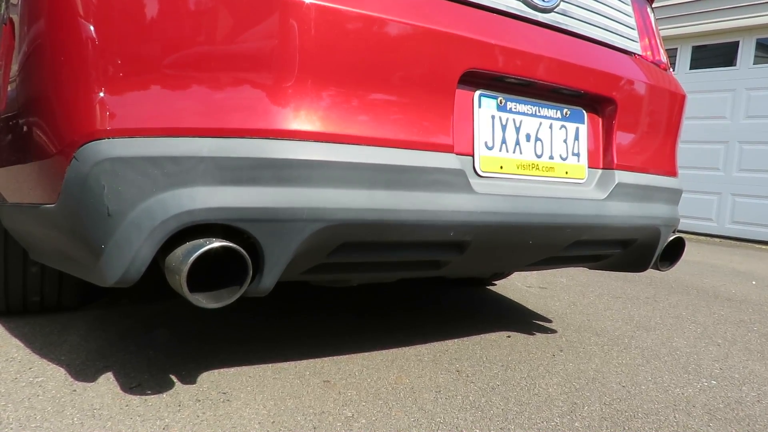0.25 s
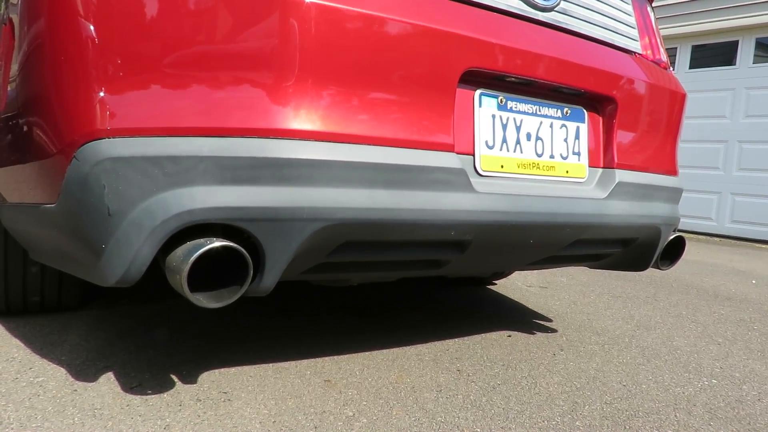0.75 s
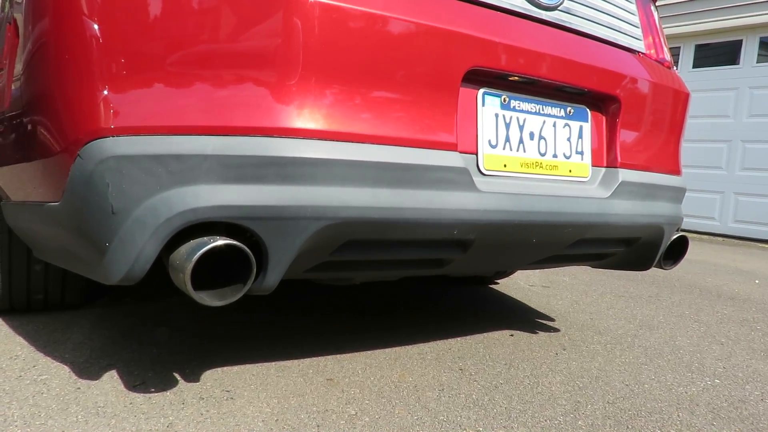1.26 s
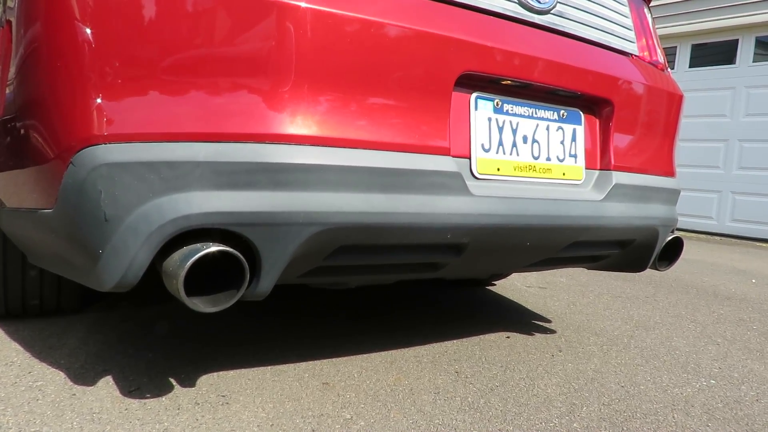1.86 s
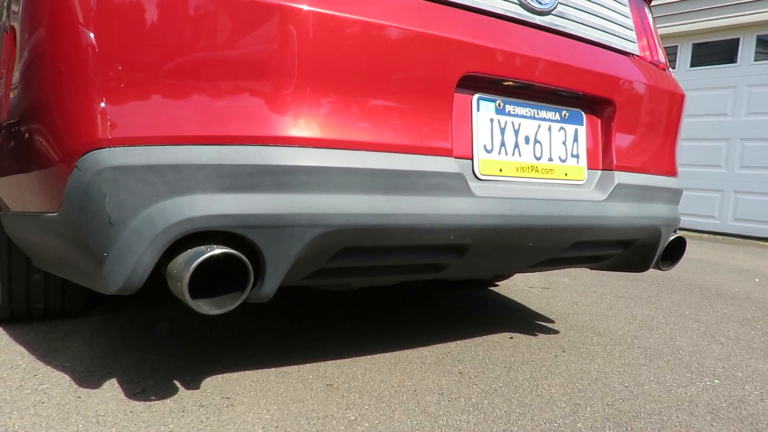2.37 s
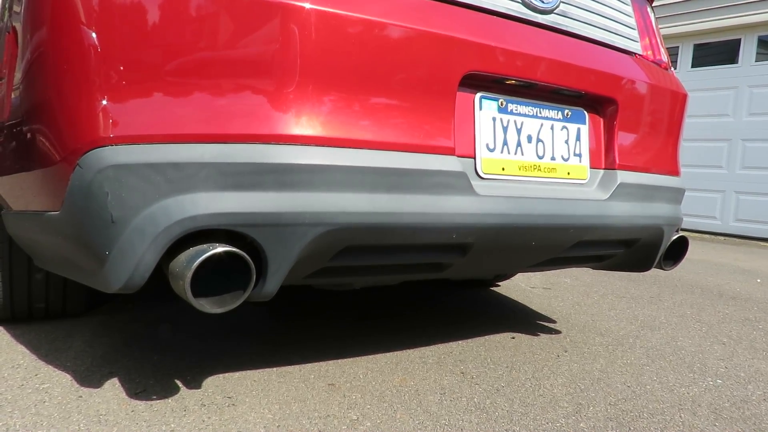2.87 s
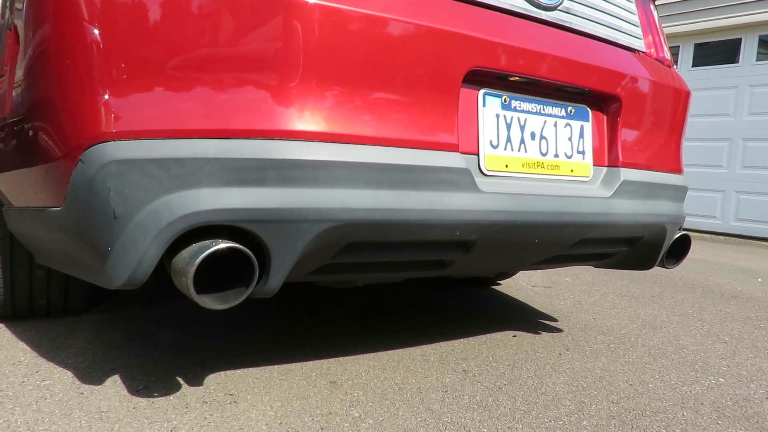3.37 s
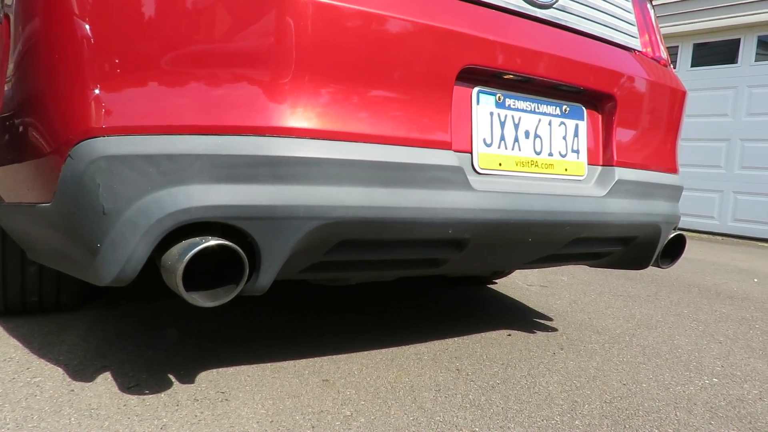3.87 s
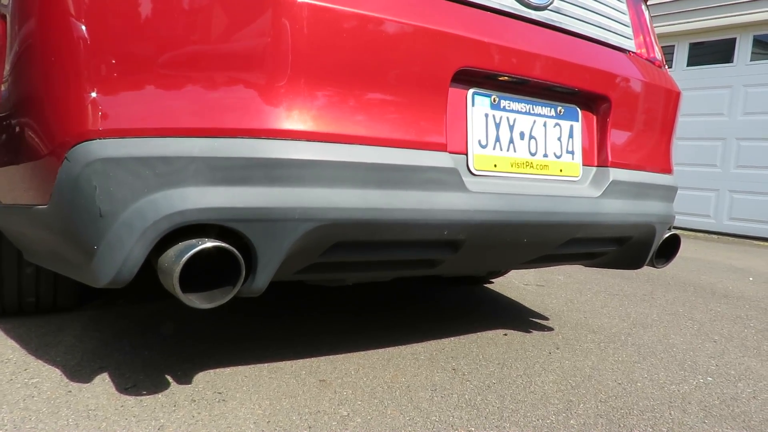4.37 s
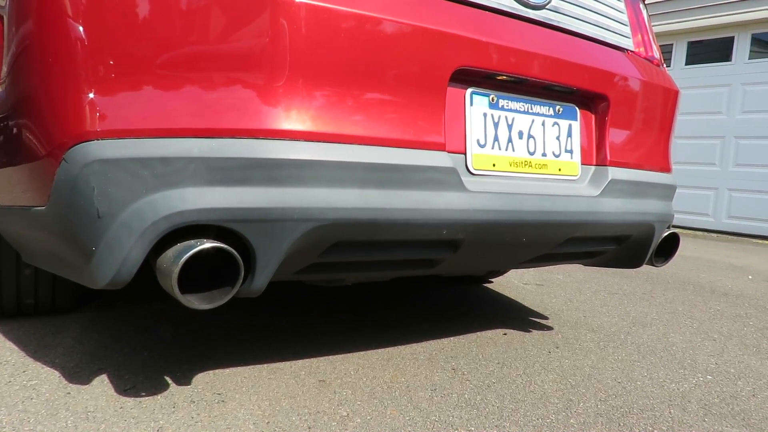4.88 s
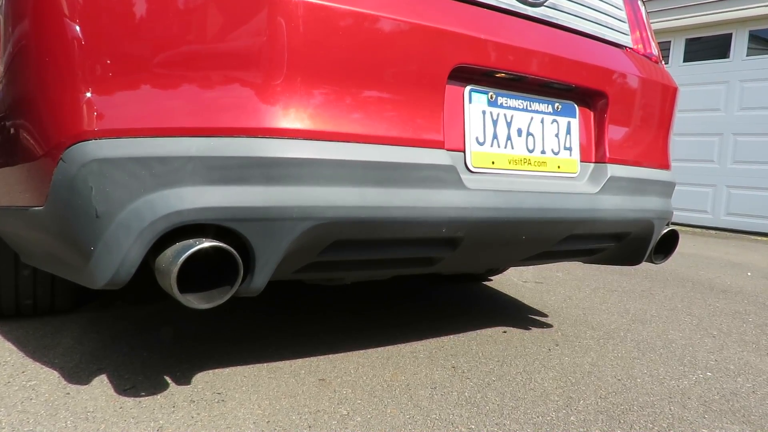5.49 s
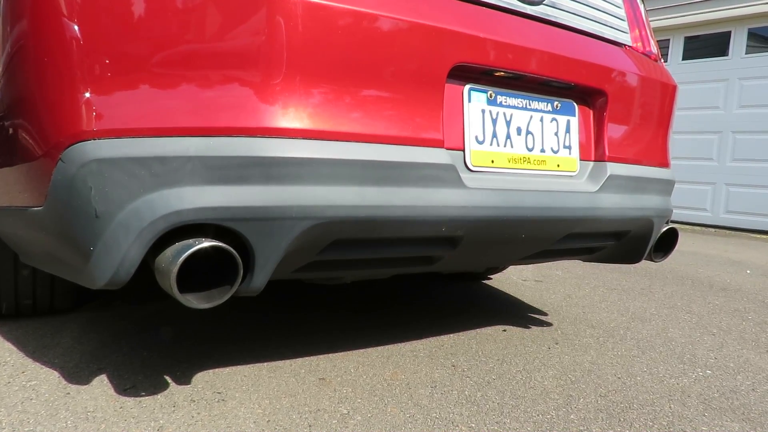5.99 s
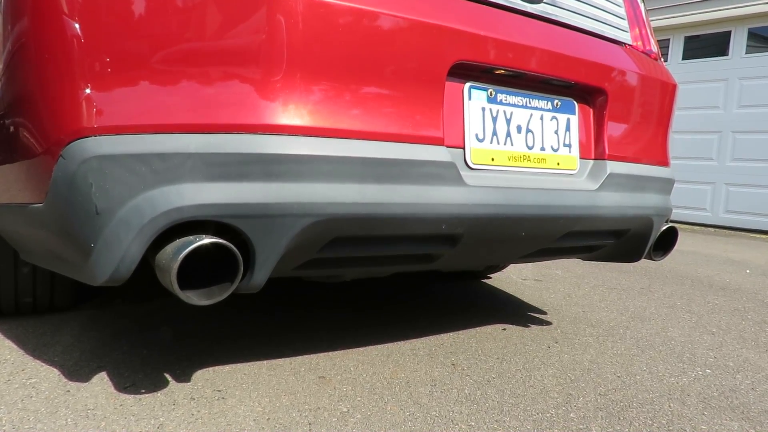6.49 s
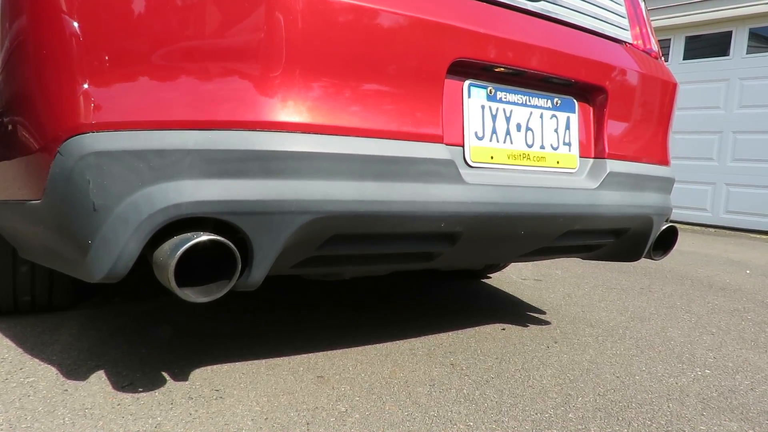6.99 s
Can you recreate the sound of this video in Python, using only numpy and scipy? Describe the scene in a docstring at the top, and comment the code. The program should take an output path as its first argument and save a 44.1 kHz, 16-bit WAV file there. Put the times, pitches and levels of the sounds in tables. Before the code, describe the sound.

A starter whines and grinds for about a second, then a big eight-cylinder engine catches, flares and settles into a deep burbling idle.

```python
"""V8 cold start, behind the tailpipes

Outdoors in a driveway, one microphone just behind the twin tailpipes of a V8 car.
The starter is commutator whine, filtered noise and hammering gear teeth; lone coughs ring decaying pipe modes.
The engine catches, flares and settles to a burbling idle: eight uneven cylinders send pulses through
pipe filters, rising chirps and tailpipe resonances, with noise for the gas. A faint rumble lies behind."""
import sys
import numpy as np
from scipy import signal
from scipy.fft import rfft, irfft
from scipy.io import wavfile
from scipy.ndimage import uniform_filter1d

SR = 44100
rng = np.random.default_rng(int(sys.argv[2]) if len(sys.argv) > 2 else 0)


def dump_mix(stems):
    """Bounce the given channels to the path in sys.argv[1] as a 16-bit WAV at rate SR."""
    frames = np.atleast_2d(stems).T  # one column per channel
    limited = np.clip(frames, -1, 1)  # hard clip at full scale
    pcm = np.round(limited * 32767).astype(np.int16)
    wavfile.write(sys.argv[1], SR, pcm)


N = 319284
T = np.arange(N) / SR  # time axis, s

# Engine speed, a flare and then a wavering idle: (t/s, four-stroke cycles per second/Hz)
ENGINE_SPEED = [(1.15, 13.561), (1.25, 12.337), (1.36, 15.103), (1.51, 15.107), (1.88, 11.982),
                (2.15, 11.002), (2.41, 10.786), (3.09, 11.384), (3.75, 10.912), (4.66, 10.955),
                (4.77, 10.576), (5.17, 11.392), (5.63, 10.822), (6.0, 10.669), (6.51, 11.11),
                (7.24, 10.811)]
# How hard the engine works, relative to idle: (t/s, level/dB)
EFFORT = [(1.16, 1), (1.23, 1), (1.35, 0.4), (1.66, -4.5), (2.16, -4.5), (2.72, 0.65), (3.51, -0.26),
          (4.69, 0.5), (4.79, -0.1), (5.02, 1), (5.54, -0.27), (5.85, 1), (6.01, -0.5), (6.27, 0.98),
          (6.62, -0.2), (7.2, 0.5)]
# Cylinders in firing order, before they are evened out at racing speed:
# (lag/firing intervals, pulse level/dB, tip ring level/dB, bite/dB, change of bite when cold/dB)
CYLINDERS = [(-0.062, -0.1, -0.5, 4.5, -7.5), (0.057, 3.1, -0.5, 3, -7), (-0.1185, -7.5, 0, 1, -6),
             (-0.111, 6, 0, 0.5, 6), (-0.186, -5, -10, -3, 4), (0.075, 0.5, -5.5, -2, -11.5),
             (-0.077, 4, -4.5, 3.5, -4), (-0.11, 2.5, -7.5, 1, -19.5)]
# Spectrum of pipes and mufflers: (f/Hz, level/dB)
PIPE_SPECTRUM = [(25, -93.5), (50, -15), (72, -10.5), (88, 0.5), (112, -0.5), (135, 4.5), (172, 4),
                 (200, -15.5), (235, -1.5), (480, 17.5), (1100, -53.5)]
# Standing waves in the tailpipes: (f/Hz, width/Hz, level/dB, change when cold/dB)
TAILPIPE_MODES = [(232.3, 7, 0, 10.5), (271, 23, -8.5, 8.5), (321, 19, 6.5, 0.5), (361, 39, 5.5, -8.5),
                  (428.6, 30.7, 2.5, 2.5), (478, 19, 5.5, 0), (532, 4.3, -8.5, -0.5), (582, 15, 0, 0.5),
                  (700.5, 9.8, 3, 3), (776, 20, 4, -4), (899, 28, 12, -14)]
# Length of the upward sweep at the pulse front: (t/s, length/s)
SWEEP_LENGTH = [(1.5, 0.0057), (2.1, 0.0154), (3.0, 0.0081), (4.0, 0.00564)]
# Spectrum of the steep front of a pulse: (f/Hz, level/dB)
CRACK_SPECTRUM = [(60, -18.5), (250, 9), (450, -14.5), (620, 3.5), (950, -0.5), (1200, -2), (1450, -17),
                  (2500, -31.5), (6000, -54.5)]
# Spectrum of the edge the fronts take on while the engine races: (f/Hz, level/dB)
SPIT_SPECTRUM = [(400, -16), (1000, -2.5), (1500, -2.5), (2600, 2), (3600, -13), (8000, -32.5)]
# Ring of the tips, each resonance passed twice: (f/Hz, width of one pass/Hz, level/dB)
TIP_MODES = [(2035, 440, 2), (2360, 220, -35), (4010, 140, -12)]
# Spectrum of gas rushing out of the tips: (f/Hz, level/dB)
HISS_SPECTRUM = [(300, 3), (1000, 12.5), (1500, -3.5), (2400, 0), (3200, -3.5), (4200, -5.5), (4800, -12),
                 (7000, -16), (8000, -20), (9000, -30), (10000, -24), (11400, -24.5), (13000, -30.5),
                 (15500, -37.5)]
# Levels of the exhaust parts, one row each:
# (level at warm idle/dB, level per effort/dB per dB, change when racing/dB, change when cold/dB)
BOOM_LEVEL = (-15.5, 1.5, -1.5, 2)
BARK_LEVEL = (-23, 1.53, -0.4, 1.54)
FRONT_LEVEL = (-30.5, 3.4, 9, -6.5)
SPIT_LEVEL = (-60, 1.9, 14.5, -0.5)
TIP_LEVEL = (-40, 3.5, 6.5, -10.5)
GAS_LEVEL = (-35.5, 1.2, -4.5, -1.96)
# Sharp pops on extra hard firings: (t/s, peak level/dB)
POPS = [(1.412, -8.5), (3.061, -15), (5.0298, -10), (5.12, -10.5), (5.2077, -9), (5.296, -12.5)]
# First firings into the cold pipes: (t/s, strike level/dB)
COUGHS = [(0.053, -44), (0.366, -34), (.557, -23.5), (0.6, -7.5), (0.641, -15.5), (0.696, -15.5),
          (0.774, -24.5), (0.817, -24), (.89, -26.5), (0.97, -32), (1.078, -8.5), (1.097, -9),
          (1.117, -8.5), (1.131, -6.5)]
# Modes of the cold pipes: (f/Hz, level/dB, 60 dB decay time/s)
COLD_PIPE_MODES = [(101.1, 5.5, 0.18), (129, -36, 0.105), (63, -28, 0.19), (165.7, -14, 0.18),
                   (217, -14.5, 0.2), (460, -5.5, 0.043)]
# Starter grinding: (t/s, length/s, load level/dB, first tooth rate f/Hz, last tooth rate f/Hz)
GRINDS = [(0.049, 0.06, -20.5, 327.5, 289.6), (0.077, 0.097, -21, 289.7, 190.8),
          (0.233, 0.07, -19, 336.7, 202.6), (0.383, 0.019, -15.5, 385, 307.6),
          (0.478, 0.055, -18.5, 404.5, 297.5), (0.835, 0.013, -13, 480, 469), (0.871, 0.028, -27, 488, 464),
          (0.899, 0.01, -13, 487.5, 466), (0.979, 0.017, -16.5, 497, 448)]
# Spectrum of starter and bell housing: (f/Hz, level/dB)
HOUSING_SPECTRUM = [(120, -9), (230, -10), (380, 1), (550, 2.5), (830, 3.5), (1200, 0.5), (1500, -2.5),
                    (1880, 6.5), (2600, 5), (3300, 0.5), (4500, -13), (7000, -22), (9000, -35),
                    (11500, -28.5), (15500, -44)]
# Starter whine, sagging under load, before its waver: (t/s, f/Hz)
MOTOR_WHINE = [(0, 2030), (.07, 2720), (.098, 2723), (.112, 2350), (.145, 2070), (.19, 2480), (.56, 2090),
               (.8, 2590), (1.15, 2560), (1.5, 1480)]
# Overtones of the whine: (multiple of its frequency, relative level/dB)
WHINE_OVERTONES = [(2, -8), (3, -15), (4, -20), (5, -26)]
# Spectrum of gears and brushes: (f/Hz, level/dB)
WHIR_SPECTRUM = [(100, -0.5), (180, -6), (300, -7), (600, -5.5), (780, 2), (1000, -6), (1200, 1.5),
                 (1450, -11.5), (2100, 1.5), (2700, -1), (3700, -10), (6800, -23.5), (8700, -33),
                 (11500, -31.5), (15400, -47)]

CATCH_S, CATCH_TURN = 1.2, .789  # the engine cycle stands at this turn at this time
RACING_FROM_HZ, RACING_SPAN_HZ = 10.9, 2.8  # cycles per second, onset and range of racing
WARM_FROM_S, WARM_S = 2.43, 2.32  # start of warming and its time constant
POP_BITE_DB = 3  # added to the bite of the firing nearest each pop
WHINE_DB, OVERTONES_DB, WHIR_DB = -52, -67.5, -26.5  # while it cranks
FREE_S, FREE_LENGTH_S, FREE_DB = 0.75, 0.29, 24  # overtones swell as the motor spins free
RELEASE_S, RUN_DOWN_DB_PER_S = 1.154, 103  # the key is let go
SQUEAL_DB, SQUEAL_ATTACK_S, SQUEAL_S, SQUEAL_FADE_S = -21.5, 0.011, 0.17, .025
TICK_S, TICK_DB = 1.3, -26
EDGE_HZ = 15650  # upper band limit of the recorder


def exhaust(hiss_throb=0.68, jitter_s=.00008, burn_db=1.5, steep_db=1.5):
    """Each firing booms through the pipes, barks in the tailpipes, cracks at its front and puffs from the tips."""
    s, pulse_db, bite_db, ring_db = firings()
    burn, late, steep, flutter = rng.standard_normal((len(s), 4)).T
    s = s + jitter_s * late
    pulses = clicks(s, amp(pulse_db + burn_db * burn))
    bite_db = bite_db + steep_db * steep

    low_pass = signal.butter(4, 205, fs=SR, output="sos")
    boom = -signal.sosfiltfilt(low_pass, colour(pulses, PIPE_SPECTRUM))

    # the flow is roughest while the engine catches
    rough = np.interp(T, [1.4, 1.7], [1.8, .8])
    swoops = sweeps(s - .003, amp(1.2 * bite_db), low_hz=255, high_hz=690)
    bark_band = signal.butter(3, [150, 850], "bandpass", fs=SR, output="sos")
    kicks = signal.sosfilt(bark_band, turbulent(swoops, rough, .012))
    chill = cold()
    bark = -sum(amp(db + cold_db * chill) * resonate(kicks, hz, width)
                for hz, width, db, cold_db in TAILPIPE_MODES)

    fronts = turbulent(sweeps(s - .0012, amp(1.15 * bite_db)), 1.5, .012)
    crack = colour(fronts, CRACK_SPECTRUM)
    spit = colour(turbulent(clicks(s, amp(bite_db)), 0.9, 0.0022), SPIT_SPECTRUM)

    puffs = fading(clicks(s + 0.0005, amp(ring_db + 4.4 * flutter)), 0.0057) * rng.standard_normal(N)
    tip = sum(amp(db) * resonate(resonate(puffs, hz, width), hz, width) for hz, width, db in TIP_MODES)
    rush = (1 + hiss_throb * evened(fading(pulses, 0.02))) * amp(1.4 * wander(80))
    hiss = evened(driveway(colour(rush * rng.standard_normal(N), HISS_SPECTRUM)))

    parts = level(*BOOM_LEVEL) * steadied(boom, 0.11)
    parts += level(*BARK_LEVEL) * steadied(bark, 0.68)
    parts += level(*FRONT_LEVEL) * steadied(crack, 0.065)
    parts += level(*SPIT_LEVEL) * steadied(spit, .2)
    parts += level(*TIP_LEVEL) * steadied(tip, 0.17)
    parts += level(*GAS_LEVEL) * hiss
    onset = np.clip((T - 1.125) / 0.064, 0, 1)
    return onset * parts


def firings(smoothing=0.35):
    """Time and strengths of every firing; the cylinders fire more alike while the engine races."""
    turns = np.cumsum(curves(ENGINE_SPEED)[0]) / SR
    turns += CATCH_TURN - np.interp(CATCH_S, T, turns)
    count = len(CYLINDERS)
    first = np.ceil(np.interp(1.135, T, turns) * count)
    slot = np.arange(first, int(turns[-1] * count)).astype(int)
    uneven = 1 - smoothing * np.interp(slot / count, turns, racing())
    lag, pulse_db, ring_db, bite_db, cold_db = np.array(CYLINDERS)[slot % count].T * uneven
    s = np.interp((slot + lag) / count, turns, T)
    bite_db += cold_db * np.interp(s, T, cold() * (1 - racing()))
    for pop_s, _ in POPS:
        bite_db[np.argmin(abs(s - pop_s))] += POP_BITE_DB
    return s, pulse_db, bite_db, ring_db


def sweeps(times, sizes, low_hz=220, high_hz=1650):
    """The pipe spreads each front into a short rising chirp."""
    out = np.zeros(N + SR)
    lengths = np.interp(times, *np.transpose(SWEEP_LENGTH))
    for s, size, length in zip(times, sizes, lengths):
        t = np.arange(0, length, 1 / SR)
        chirp = signal.chirp(t, low_hz, length, high_hz, method="logarithmic")
        chirp *= signal.windows.tukey(len(t), .3)
        out[round(s * SR):][:len(t)] += size * chirp / np.sqrt(length)
    return out[:N]


def turbulent(x, share, seconds):
    """A puff of turbulence, noise with a decaying envelope, trails every pulse."""
    puff = np.sqrt(fading(x ** 2, seconds)) * rng.standard_normal(N)
    return evened(x) + share * evened(puff)


def racing():
    """Engine speed as a share of racing: 0 at slow idle, 1 at the top of the flare."""
    return np.clip((curves(ENGINE_SPEED)[0] - RACING_FROM_HZ) / RACING_SPAN_HZ, 0, 1)


def cold():
    """Coldness of the exhaust: 1 at first, then an exponential decay."""
    return np.exp(-np.maximum(T - WARM_FROM_S, 0) / WARM_S)


def level(idle_db, per_effort, racing_db, cold_db):
    """Gain of one part of the exhaust, from effort, speed and coldness."""
    return amp(idle_db + per_effort * curves(EFFORT)[0] + racing_db * racing() + cold_db * cold())


def pops():
    """Now and then a firing leaves the pipe as a sharp pop, a click with the colour of a steep front."""
    s, db = np.transpose(POPS)
    peak = abs(colour(clicks([0], [1]), CRACK_SPECTRUM)).max()
    return colour(clicks(s, amp(db)), CRACK_SPECTRUM) / peak


def coughs(swell_s=0.0047):
    """Lone firings set the cold pipes booming in decaying modes that swell in softly."""
    s, db = np.transpose(COUGHS)
    t = T[:SR // 2]
    ring = sum(amp(mode_db - 60 * t / t60) * np.sin(2 * np.pi * hz * t)
               for hz, mode_db, t60 in COLD_PIPE_MODES)
    ring *= 1 - np.exp(-t / swell_s)
    return -signal.oaconvolve(clicks(s, amp(db)), ring)[:N]


def grinding(scrape=0.092, tooth_uneven_db=3.0, ring_s=0.021, attack_s=0.0022, growl_db=-1, growl_hz=280):
    """Pinion teeth hammer and scrape on the ring gear under load, and growl as the crank slows."""
    clatter, growl = np.zeros((2, N))
    for s, length, db, first_hz, last_hz in GRINDS:
        t = T - s
        load = amp(db) * np.clip(t / attack_s, 0, 1) * np.exp(-np.maximum(t - length, 0) / ring_s)
        hz = np.interp(t, [0, length], [first_hz, last_hz])
        turns = np.cumsum(hz) / SR
        # one click each time another tooth meets
        teeth = np.diff(np.floor(turns), prepend=0) * amp(tooth_uneven_db * rng.standard_normal(N))
        scraping = fading(teeth, 0.008) * rng.standard_normal(N)
        clatter += load * evened(teeth + scrape * scraping)
        growl += load * np.sin(2 * np.pi * turns) / (1 + (hz / growl_hz) ** 4)
    housing_gain = np.linalg.norm(colour(clicks([0], [1]), HOUSING_SPECTRUM))
    return colour(clatter, HOUSING_SPECTRUM) / housing_gain + amp(growl_db) * growl


def housing_modes(x, ring_db=-1):
    """A few sharp metal resonances ring on above the clatter."""
    modes = [(840, 164), (1213, 25), (1872, 16), (2595, 9.9)]  # (f/Hz, width/Hz)
    return x + amp(ring_db) * sum(resonate(x, hz, width) for hz, width in modes)


def starter_motor(waver=0.0152):
    """Commutator whine, squealing under its first load, in a whir of gears and brushes; it dies on release."""
    turns = np.cumsum(curves(MOTOR_WHINE)[0] * (1 + waver * wander(250))) / SR
    whine = evened(np.sin(2 * np.pi * turns + 0.25 * wander(270)) * amp(5.9 * wander(99)))
    shaft = 2 * np.pi * turns + .35 * wander(200)
    overtones = evened(sum(amp(db) * np.sin(round(k) * shaft) for k, db in WHINE_OVERTONES))
    whir = evened(colour(rng.standard_normal(N) * amp(1.1 * wander(200)), WHIR_SPECTRUM))
    squeal = amp(SQUEAL_DB) * np.minimum(T / SQUEAL_ATTACK_S, 1)
    squeal *= np.exp(-np.maximum(T - SQUEAL_S, 0) / SQUEAL_FADE_S)
    free = np.exp(-((T - FREE_S) / FREE_LENGTH_S) ** 2)
    powered = amp(-RUN_DOWN_DB_PER_S * np.maximum(T - RELEASE_S, 0))
    tones = (amp(WHINE_DB) + squeal) * whine + amp(OVERTONES_DB + FREE_DB * free) * overtones
    return powered * (tones + amp(WHIR_DB) * whir)


def tick():
    """A single dry tick, one impulse."""
    return clicks([TICK_S], amp(TICK_DB))


def driveway(x, wet_db=-11, t60=0.072):
    """Scattered, decaying reflections off the ground, the underbody and the garage front."""
    t = T[:SR // 3]
    sparse = rng.random(len(t)) < 2000 / SR  # about 2000 reflections a second
    taps = rng.standard_normal(len(t)) * sparse * amp(-60 * t / t60) * (t > .003)
    return x + amp(wet_db) * signal.oaconvolve(x, taps / np.linalg.norm(taps))[:N]


def outdoors(db=-53):
    """Faint open-air rumble of filtered noise."""
    spectrum = [(25, -6.5), (60, -11.5), (150, -5), (500, 6.5), (3000, -44.0), (15000, -58.0)]  # (f/Hz, level/dB)
    return amp(db) * evened(colour(rng.standard_normal(N), spectrum))


def amp(db):
    """dB to gain."""
    return 10 ** (np.asarray(db) / 20)


def evened(x):
    """Scaled to unit rms."""
    return x / np.sqrt(np.mean(x ** 2) + 1e-20)


def steadied(x, seconds):
    """Brought near unit level by a running average of power; faint passages are lifted less."""
    size = int(seconds * SR)
    power = uniform_filter1d(uniform_filter1d(x ** 2, size), size)
    return x / np.sqrt(abs(power) + np.mean(x ** 2) / 10 ** 2)


def curves(rows):
    """Each column of a timed table as a curve over the whole scene."""
    s, *columns = np.transpose(rows)
    return [np.interp(T, s, c) for c in columns]


def wander(hz):
    """Random drift of unit rms, holding only rates below the given one."""
    return evened(irfft(rfft(rng.standard_normal(N)) * (np.fft.rfftfreq(N, 1 / SR) < hz), N))


def colour(x, points, order=8192):
    """Causal minimum-phase filter with the given spectrum, falling away beyond its last point."""
    hz, db = np.transpose(points)
    f = np.fft.rfftfreq(order, 1 / SR) + 1
    gain_db = np.interp(np.log(f), np.log(hz), db)
    gain_db -= 30 * np.clip(np.log2(f / hz[-1]), 0, 2)  # 30 dB an octave, for two octaves
    # folding the cepstrum forward in time gives the minimum phase
    cepstrum = irfft(np.log(amp(gain_db)))
    cepstrum[1:order // 2] *= 2
    cepstrum[order // 2 + 1:] = 0
    return signal.oaconvolve(x, irfft(np.exp(rfft(cepstrum))))[:N]


def resonate(x, hz, width):
    """One resonance of gain 1 at its peak."""
    return signal.lfilter(*signal.iirpeak(hz, hz / width, SR), x)


def clicks(s, size):
    """Impulses of the given sizes at the given times."""
    train = np.zeros(N)
    np.add.at(train, np.clip(np.round(np.asarray(s) * SR).astype(int), 0, N - 1), size)
    return train


def fading(x, seconds):
    """Every click becomes an exponential decay of the same height."""
    return signal.lfilter([1], [1, -np.exp(-1 / (seconds * SR))], x)


def scene():
    """Running exhaust, first coughs and starter, in the open air."""
    starter = driveway(housing_modes(grinding()) + starter_motor())
    return (exhaust() + pops() + coughs() + starter + tick() + outdoors())[None]


def record(dry):
    """The recorder rounds off the highest peaks, then limits the band."""
    rounded = dry / (1 + (abs(dry) / .9) ** 6) ** (1 / 6)
    low_pass = signal.firwin(511, EDGE_HZ, window=("kaiser", 9), fs=SR)
    return signal.oaconvolve(rounded, low_pass[None], "same")


dry = scene()
out = record(dry)
dump_mix(out)
```